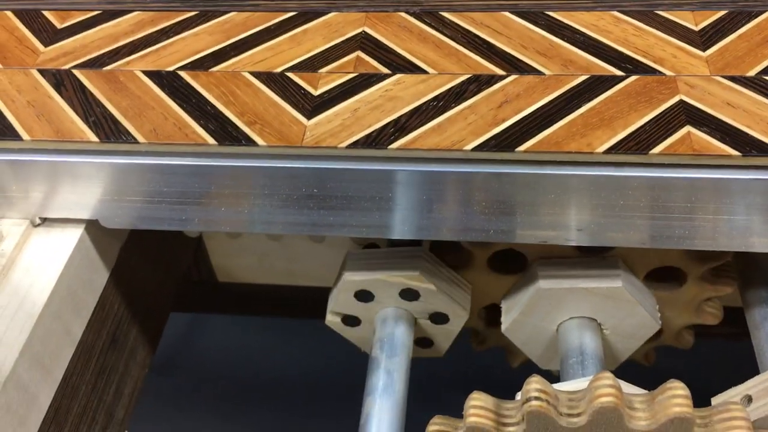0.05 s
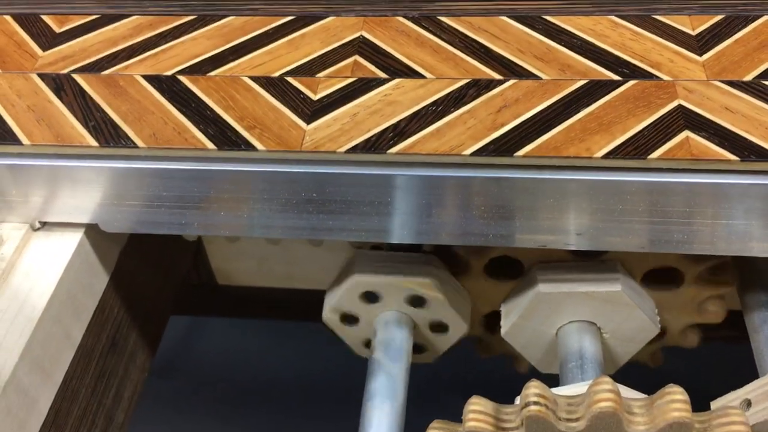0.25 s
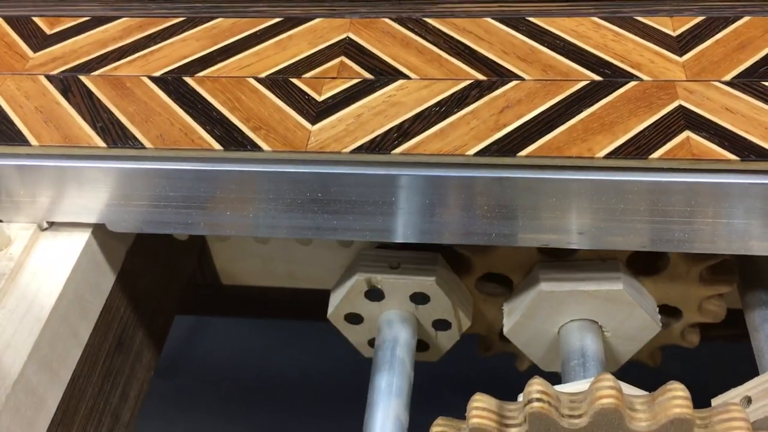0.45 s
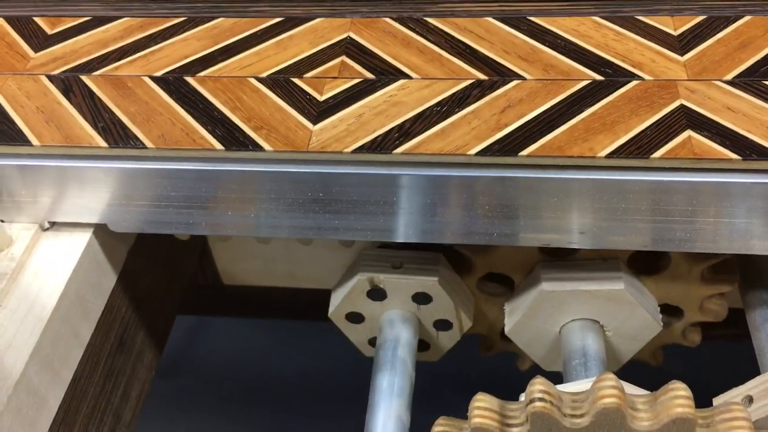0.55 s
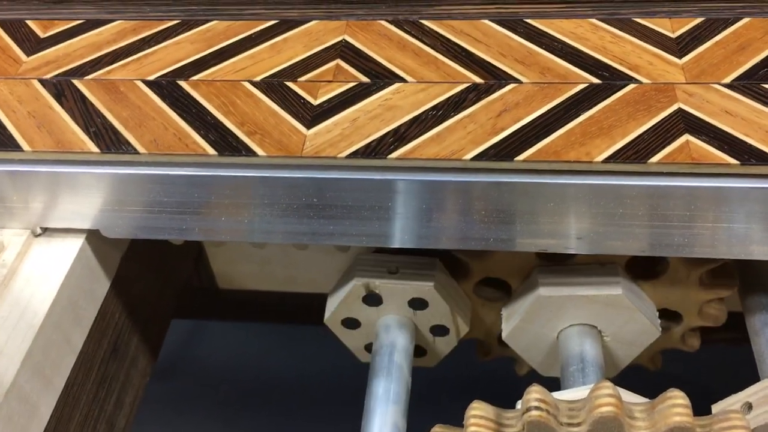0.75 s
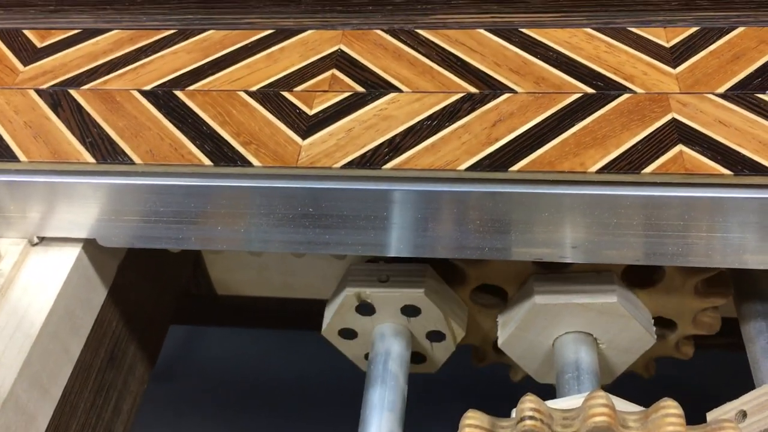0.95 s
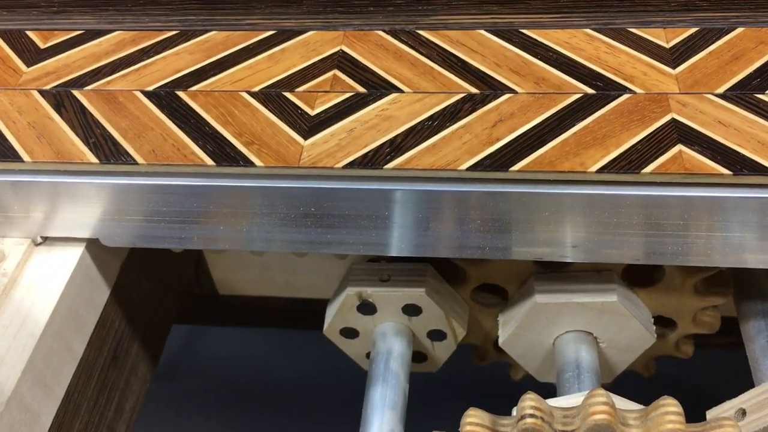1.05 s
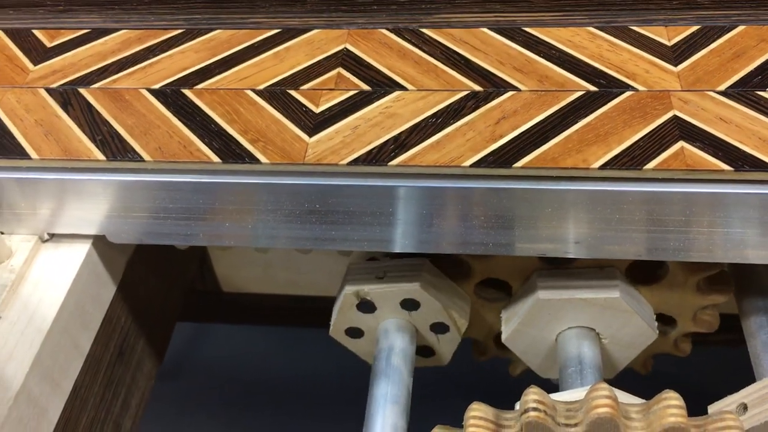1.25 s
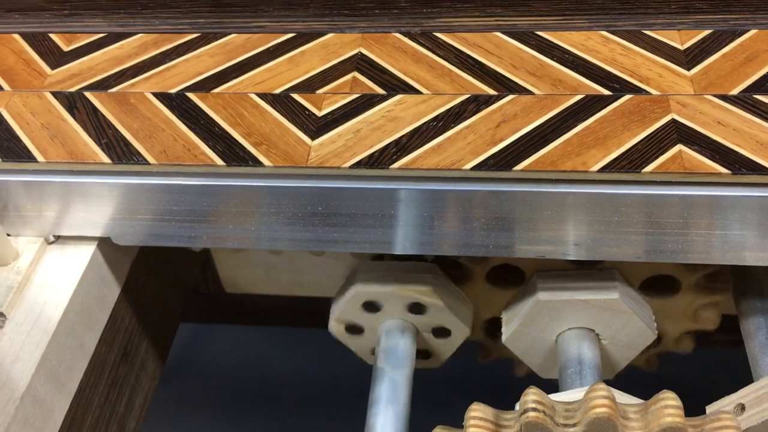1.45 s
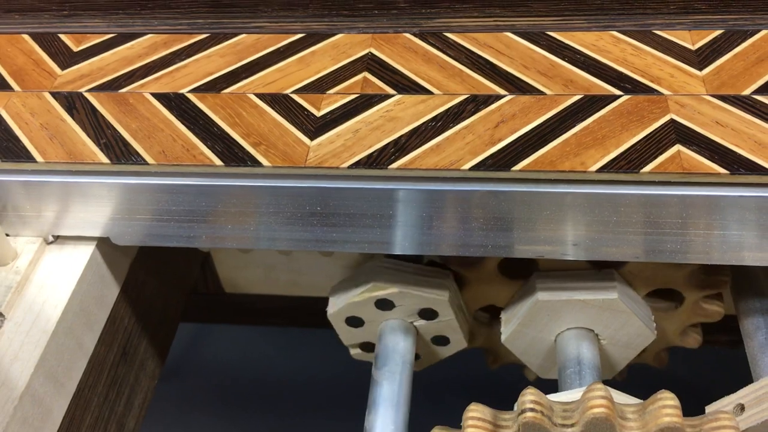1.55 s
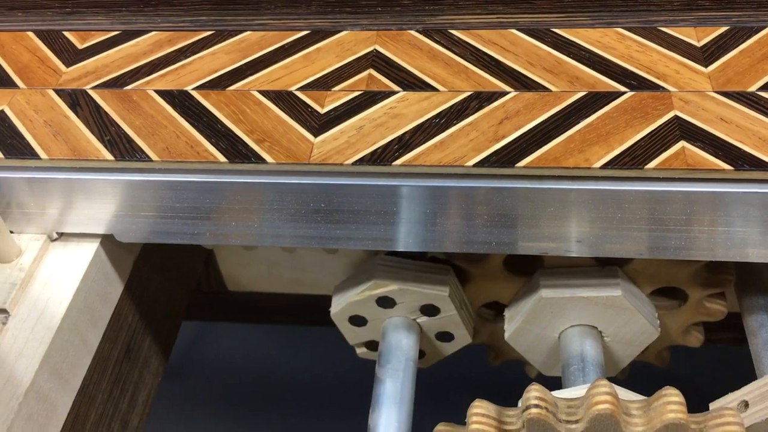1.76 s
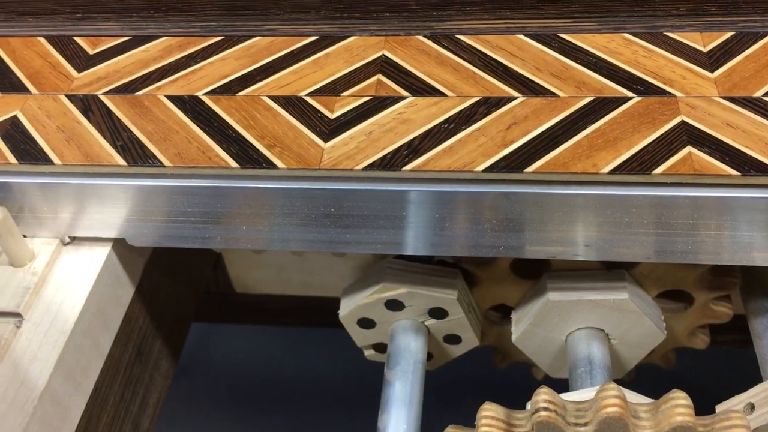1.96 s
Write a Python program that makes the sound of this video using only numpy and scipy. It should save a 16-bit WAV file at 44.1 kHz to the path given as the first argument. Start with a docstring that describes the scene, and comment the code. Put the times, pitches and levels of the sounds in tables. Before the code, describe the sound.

Wooden gear teeth slide, creak and knock into place twice, close by.

```python
"""Wooden gears under a table

The gears are turned in two pushes, close by in a quiet room with a steady hum and a low rumble.
Their teeth slide and creak, then drop into place with a clunk that rings the frame.
A metal shaft ticks and chafes in its bearing, and the table rumbles with each push."""
import sys
import numpy as np
from scipy import signal
from scipy.io import wavfile

SR = 44100
rng = np.random.default_rng(int(sys.argv[2]) if len(sys.argv) > 2 else 0)


def file_out(sig):
    """Save sig as 16-bit WAV at sys.argv[1]."""
    # one column per channel
    cols = np.atleast_2d(sig).T
    # limit, then scale
    lim = np.clip(cols, -1, 1)
    pcm = np.round(lim * 32767).astype(np.int16)
    wavfile.write(sys.argv[1], SR, pcm)


N = 88200
T = np.arange(N) / SR
BAND_EDGES = 22 * 2 ** np.arange(0, 9.8, 1 / 3)  # Hz, three bands to the octave
BAND_CENTRES = np.sqrt(BAND_EDGES[1:] * BAND_EDGES[:-1])

# tones of the room's hum: f/Hz, level/dB
HUM_TONES = [(159.5, -46), (41.3, -51), (212, -78)]
# colour (strength from low to high) of the room's noise: f/Hz, relative level/dB
AIR_COLOUR = [(25, -35), (42, -1), (62, 4.5), (85, -10.5), (120, -7.5), (200, -18.5), (300, -27),
              (550, -36), (1200, -40.5), (2500, -49), (4500, -49.5), (9000, -56), (13000, -56),
              (16000, -62.5)]
# two pitches where that noise sounds hollow: f/Hz, width/Hz, relative level/dB
HOLLOW_MODES = [(376, 30, -10), (693, 27, 1.5)]

# pushes that shake the table: start/s, end/s, level/dB
PUSHES = [(0.32, .56, -54.5), (1.326, 1.704, -45.5)]
# the table's modes (pitches it likes to ring at): f/Hz, width/Hz, relative level/dB
TABLE_MODES = [(65, 10.4, -3.5), (102, 7.9, -2)]

# the shaft chafes in its bearing: t/s, length/s, level/dB
SHAFT_CHAFES = [(0.962, 0.01, -64.5), (1.757, .006, -59.5), (1.770, 0.0081, -58.5), (1.964, 0.046, -51.5)]
# ring of the shaft: f/Hz, width/Hz, relative level/dB
SHAFT_MODES = [(1060, 120, 9.5), (1380, 51, 4.5), (1650, 140, -7), (3854, 34, 6.5), (5100, 69, -1),
               (5160, 37, -4), (6620, 98, -11), (6800, 81, -11), (9400, 110, -16)]
# ticks of the loose shaft: t/s, level/dB
SHAFT_TICKS = [(0.564, -51), (0.584, -49)]
# colour of a tick: f/Hz, relative level/dB
TICK_COLOUR = [(700, 10.5), (1700, 4.5), (3000, -11), (4200, -1), (7000, -7.5), (8500, -18), (15000, -27)]

# loudness of the soft rub: t/s, level/dB
RUB_CURVE = [(.95, -81), (.97, -64), (1.05, -64.5), (1.18, -70), (1.28, -88)]
# colour of the rub: f/Hz, relative level/dB
RUB_COLOUR = [(400, -2), (1000, 2.5), (1600, 0), (2500, 0), (3300, -7.5), (5000, -18), (9000, -24),
              (15000, -41)]

# a tooth creaks as it lets go: t/s, length/s, level/dB
TOOTH_CREAKS = [(.174, 0.0052, -60.5), (.323, 0.023, -48), (.937, .017, -49.5), (1.533, .034, -40.5)]
# ring of one tooth: f/Hz, width/Hz, relative level/dB
TOOTH_MODES = [(1286, 31, 1.5), (1468, 33, 2), (1756, 35, -10.5)]

# teeth sliding (an early end cuts the swell short): start/s, peak/s, end/s, level/dB, treble/dB
TOOTH_SLIDES = [(0, 0.003, 0.035, -58.5, -4), (0.221, 0.307, 0.38, -60, 1), (0.308, .326, 0.34, -45.5, 5),
                (0.308, 0.35, 0.38, -49, -5.5), (0.353, .368, 0.36, -55, 4), (0.413, 0.444, 0.48, -44, 3.5),
                (0.914, 0.928, .942, -64.5, 5), (1.202, 1.219, 1.295, -64, 1),
                (1.299, 1.352, 1.344, -52, 3), (1.333, 1.36, 1.401, -47, -7.5),
                (1.368, 1.408, 1.505, -54.5, -3.5), (1.437, 1.463, 1.458, -52.5, 5),
                (1.464, 1.496, 1.52, -54, -23), (1.509, 1.529, 1.61, -47.5, 2),
                (1.52, 1.526, 1.525, -43.5, 3), (1.596, 1.622, 1.64, -61, -5)]
# colour of a slide: f/Hz, relative level/dB
SLIDE_COLOUR = [(200, 10), (500, -3.5), (900, 3), (1500, -3), (2200, -10.5), (3000, -8.5), (5000, -15.5),
                (7000, -16.5), (10000, -23), (13000, -39), (16000, -38)]
# ring of the gear under a slide: f/Hz, width/Hz, relative level/dB
GEAR_MODES = [(536, 23, 11.5), (1454, 66, 6.5), (1810, 57, 2.5), (2280, 52, -1), (3100, 34, -12.5),
              (3770, 180, -9.5), (5340, 96, -10), (5670, 37, -11), (6600, 135, -12), (7040, 100, -16),
              (9040, 290, -17.5), (10900, 60, -23), (13400, 130, -18)]

# teeth dropping into place: t/s, level/dB, bass/dB, treble cut-off/Hz, crack/dB
TOOTH_KNOCKS = [(0.3223, -49, -22, 3000, -3), (.3275, -33.5, -3, 1800, 0), (0.341, -37.5, 10, 2270, -13),
                (.3545, -30, 2, 910, -8), (.3678, -33, -2.5, 1290, 9.5), (.3755, -31, 2, 900, -10),
                (0.4606, -20, 5.5, 1735, 0), (0.4687, -27.5, 8, 1310, 0.5), (.936, -39, -4, 1510, -1.5),
                (.943, -35.5, 4, 1280, -17), (1.224, -51.5, 7.5, 1110, -15), (1.238, -46, 6, 1040, -3),
                (1.3961, -30.5, -1, 1400, 4.5), (1.406, -37.5, -1, 1260, 6.5), (1.455, -45.5, 9, 1310, -1),
                (1.5305, -22.5, -1.5, 1730, 6), (1.5426, -26.5, -3.5, 1950, -7),
                (1.548, -33, -8, 1400, -27), (1.558, -33, 8, 1230, -15), (1.563, -29, -26, 1400, -16),
                (1.5964, -37, -18, 1400, 10), (1.626, -48.5, 22.5, 1310, 0), (1.758, -46, -14, 1590, 2.5),
                (1.77, -55, 12, 1230, 4)]
# ring of the gears and frame: f/Hz, relative level/dB, t60/s (time to fade by 60 dB)
FRAME_MODES = [(212.3, -12.5, 0.24), (243.7, -13.5, 0.15), (270.3, -11.5, 0.23), (301.2, -17.5, 0.39),
               (326.8, -15.5, 0.19), (372, -22, 0.11), (433.3, -12, 0.1), (520.4, -14, 0.14),
               (558, -12.5, 0.12), (613.6, -15, .14), (700, -15.5, 0.15), (731, -23.5, 0.13),
               (826.4, -11.5, 0.045), (975.5, -17.5, 0.061), (1162, -26.5, 0.11), (1277, -12, 0.072),
               (1400, -18, 0.14), (1453, -9, 0.033), (1784, -7, 0.034), (1842, -29.5, 0.15),
               (2147, -15, 0.075)]
# colour of the wood's noisy ring between those modes: f/Hz, relative level/dB
WOOD_COLOUR = [(60, -4.5), (105, -1), (150, -6), (240, 3), (500, -1.5), (1000, 0.5), (1500, 1), (2200, -6),
               (3200, -13.5), (6000, -21.5), (15000, -15)]
# how long that noisy ring lasts: f/Hz, t60/s
WOOD_RING_TIMES = [(100, 0.48), (250, 0.3), (600, 0.075), (1500, 0.031), (4000, 0.071), (12000, 0.021)]

BASS_HZ, TREBLE_HZ = 338, 3000  # where the bass ends and the treble begins


def from_db(db):
    """Turn decibels into a gain to multiply by."""
    return 10 ** (np.asarray(db) / 20)


def at_hz(points, hz):
    """Read between a table's rows, with octaves evenly spaced."""
    freqs, values = np.transpose(points)
    return np.interp(np.log(hz), np.log(freqs), values)


def fade(t, t60):
    """A gain that falls by 60 dB in t60 seconds."""
    return np.exp(-np.log(1000) * t / t60)


def bursts(events):
    """A gain that switches on for the length of each event."""
    return sum(from_db(db) * ((T >= start) & (T < start + length)) for start, length, db in events)


def split_bands(noises):
    """Make a row of bands, low to high, taking turns between two unrelated noises."""
    run_in = N // 4  # lets the filters settle
    padded = np.hstack([noises[:, -run_in:], noises])
    filters = [signal.butter(2, edges, "band", fs=SR, output="sos")
               for edges in zip(BAND_EDGES, BAND_EDGES[1:])]
    return np.array([signal.sosfilt(sos, padded[k % 2])[run_in:] for k, sos in enumerate(filters)])


def band_gains(colour):
    """Gains that mix bands of white noise into this colour, at an average power of 1."""
    gains = from_db(at_hz(colour, BAND_CENTRES))
    return gains / np.sqrt(np.sum(gains ** 2 * np.diff(BAND_EDGES)) * 2 / SR)


def coloured_noise(colour):
    """Steady noise with the given colour."""
    return band_gains(colour) @ split_bands(rng.standard_normal((2, N)))


def resonate(force, modes):
    """Let a force ring all the modes at once; white noise keeps its power."""
    out, power = 0, 0
    for hz, width_hz, db in modes:
        decay = np.exp(-np.pi * width_hz / SR)  # share of the ring left after one sample
        feed = np.array([1, 0, -1]) * (1 - decay ** 2) / 2
        feedback = [1, -2 * decay * np.cos(2 * np.pi * hz / SR), decay ** 2]
        out = out + from_db(db) * signal.lfilter(feed, feedback, force + 1e-18)
        power += from_db(db) ** 2 * (1 - decay)
    return out / np.sqrt(power)


def friction(slips_per_s=2300, spread_db=2.5, slip_share=0.49):
    """Rubbing makes tiny slips of uneven size over a smooth hiss."""
    sizes = from_db(spread_db * np.minimum(rng.exponential(1, N), 4)) * rng.choice([-1, 1], N)
    slips = sizes * (rng.random(N) < slips_per_s / SR)
    slips /= np.sqrt(np.mean(slips ** 2) + 1e-20)
    return np.sqrt(slip_share) * slips + np.sqrt(1 - slip_share) * rng.standard_normal(N)


def room_tone():
    """A steady hum over a rumble and a faint, hollow hiss."""
    hum = sum(from_db(db) * np.sqrt(2) * np.sin(2 * np.pi * (hz * T + rng.random()))
              for hz, db in HUM_TONES)
    hollow = from_db(-78) * resonate(rng.standard_normal(N), HOLLOW_MODES)
    return hum + hollow + from_db(-47) * coloured_noise(AIR_COLOUR)


def table_rumble():
    """Each push swells and fades, shaking the table's low modes."""
    swell = sum(from_db(db) * np.sin(np.pi * np.clip((T - start) / (end - start), 0, 1))
                for start, end, db in PUSHES)
    return resonate(swell * rng.standard_normal(N), TABLE_MODES)


def shaft(bounce_s=0.0072, bounce_db=-10, tick_t60_s=0.026):
    """Chafing rings the metal shaft; being loose, it also gives dry ticks that bounce once."""
    chafing = resonate(friction() * bursts(SHAFT_CHAFES), SHAFT_MODES)
    bounces = [(start + bounce_s, db + bounce_db) for start, db in SHAFT_TICKS]
    tick_level = sum(from_db(db) * (T >= start) * fade(np.abs(T - start), tick_t60_s)
                     for start, db in [*SHAFT_TICKS, *bounces])
    return chafing + tick_level * coloured_noise(TICK_COLOUR)


def soft_rub(friction_bands):
    """Quiet friction goes on between the pushes."""
    level_db = np.interp(T, *np.transpose(RUB_CURVE), left=-np.inf, right=-np.inf)
    return from_db(level_db) * (band_gains(RUB_COLOUR) @ friction_bands)


def creaks():
    """Short bursts of friction ring a single tooth."""
    return resonate(bursts(TOOTH_CREAKS) * friction(), TOOTH_MODES)


def slides(friction_bands, swell_db=24.5, ring_db=-3.5):
    """Tooth rubs on tooth: grainy friction swells, fades and rings the gear."""
    treble = 1 / (1 + (TREBLE_HZ / BAND_CENTRES) ** 4)
    slips, out = friction(), np.zeros(N)
    for start, peak, end, db, treble_db in TOOTH_SLIDES:
        from_peak = np.abs(np.interp(T, [start, peak, end], [-1, 0, 1]))
        level = from_db(db - swell_db * from_peak ** 1.58) * (from_peak < 1)
        gains = band_gains(SLIDE_COLOUR) * from_db(treble_db * treble)
        out += level * (gains @ friction_bands)
        modes = [(hz, width, mode_db + treble_db * (hz > TREBLE_HZ)) for hz, width, mode_db in GEAR_MODES]
        out += from_db(ring_db) * resonate(level * slips, modes)
    return out


def blow_gain(hz, bass_db, cut_hz):
    """A heavy blow moves the frame more and adds bass; a soft one loses treble."""
    return from_db(bass_db / (1 + (hz / BASS_HZ) ** 4)) / np.sqrt(1 + (hz / cut_hz) ** 4)


def crack(t, cut_hz, low_hz=460, hard_hz=1900):
    """The contact itself: a short pulse with a faint snap on top, which softer contacts lose."""
    top_hz = max(1.032 * cut_hz, 2 * low_hz)
    band = signal.butter(4, [low_hz, top_hz], "band", fs=SR, output="sos")
    pulse = signal.sosfilt(band, (t == 0) + 1e-18)
    hardness = min(cut_hz / hard_hz, 1) ** 4
    snap = from_db(-26.5) * hardness * fade(t, t60=0.0103) * rng.standard_normal(len(t))
    return pulse / np.abs(pulse).max() + snap


def knocks(rise_s=0.0013):
    """A tooth drops into place: it cracks, rings the frame and the wood, and echoes faintly."""
    t, out = T[:N // 4], np.zeros(2 * N)
    noise = split_bands(rng.standard_normal((2, N)))
    wood_fade = from_db(-6) * fade(t, at_hz(WOOD_RING_TIMES, BAND_CENTRES)[:, None])
    room_fade = from_db(-26) * fade(t, t60=0.42)
    band_levels = (wood_fade + room_fade) * band_gains(WOOD_COLOUR)[:, None] * (1 - np.exp(-t / rise_s))
    for start_s, db, bass_db, cut_hz, crack_db in TOOTH_KNOCKS:
        offset = rng.integers(N - len(t))
        noisy_ring = band_levels * noise[:, offset:offset + len(t)]
        knock = blow_gain(BAND_CENTRES, bass_db, cut_hz) @ noisy_ring
        knock += from_db(crack_db) * crack(t, cut_hz)
        for k, (hz, mode_db, t60) in enumerate(FRAME_MODES):
            rise = 1 - np.exp(-t * hz / (rise_s * BASS_HZ))  # low modes build up more slowly
            gain = (-1) ** k * from_db(mode_db + rng.normal(0, 2.1)) * blow_gain(hz, bass_db, cut_hz)
            knock += gain * rise * fade(t, t60) * np.sin(2 * np.pi * hz * t)
        start = int(start_s * SR)
        out[start:start + len(t)] += from_db(db) * knock
    return out[:N]


def scene():
    """The room and the gears, added into one channel."""
    room = room_tone()
    friction_bands = split_bands(np.array([friction(), friction()]))
    rubbing = soft_rub(friction_bands) + slides(friction_bands)
    return (room + rubbing + shaft() + knocks() + creaks() + table_rumble())[None]


def record(dry, dip_hz=10400, dip_width_hz=530, dip_share=0.42, low_cut_hz=29, high_cut_hz=15750):
    """The microphone has a dip in the treble and loses the deepest bass and the very top."""
    notched = signal.lfilter(*signal.iirnotch(dip_hz, dip_hz / dip_width_hz, fs=SR), dry)
    sound = dry + dip_share * (notched - dry)
    sound = signal.sosfilt(signal.butter(4, low_cut_hz, "high", fs=SR, output="sos"), sound)
    return signal.sosfilt(signal.ellip(12, .1, 80, high_cut_hz, fs=SR, output="sos"), sound)


dry = scene()
out = record(dry)
file_out(out)
```